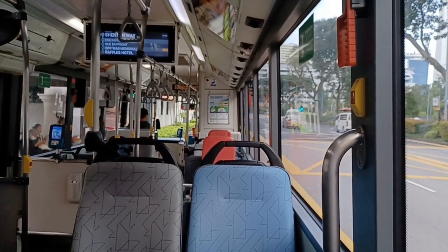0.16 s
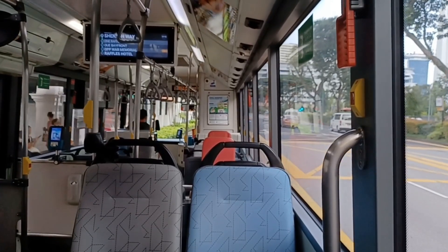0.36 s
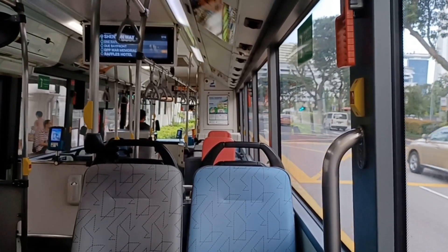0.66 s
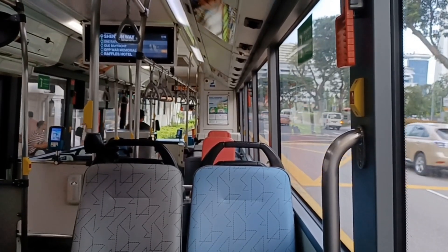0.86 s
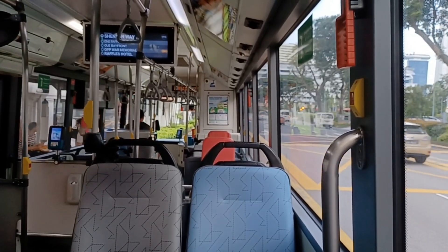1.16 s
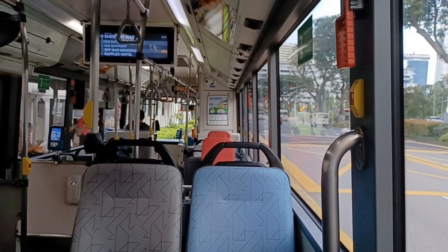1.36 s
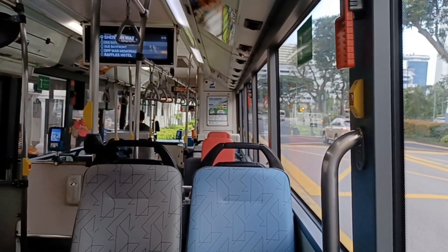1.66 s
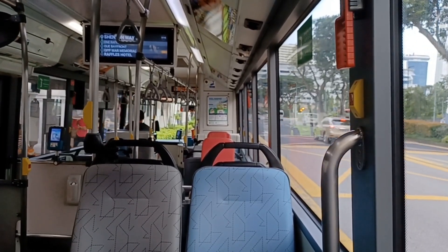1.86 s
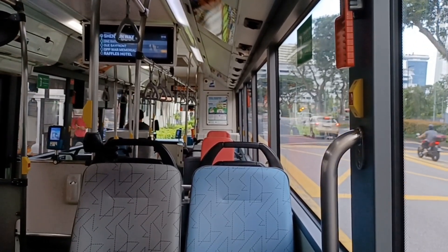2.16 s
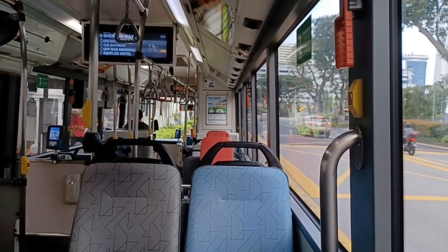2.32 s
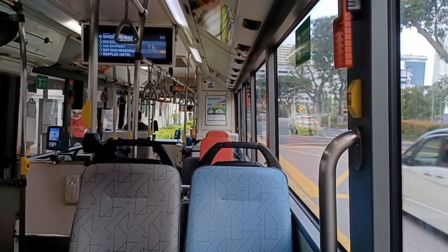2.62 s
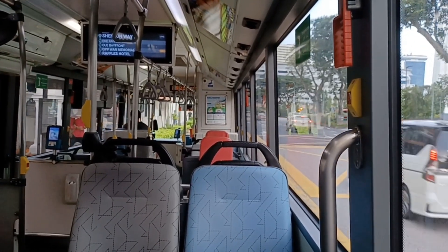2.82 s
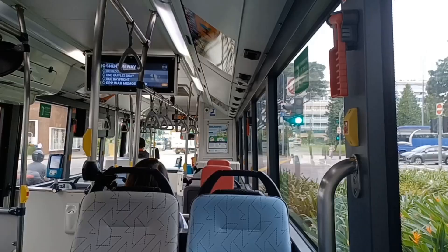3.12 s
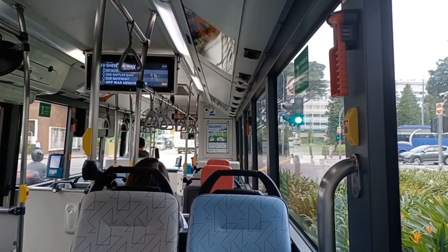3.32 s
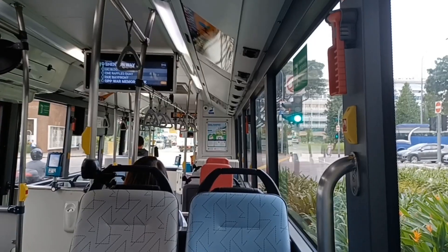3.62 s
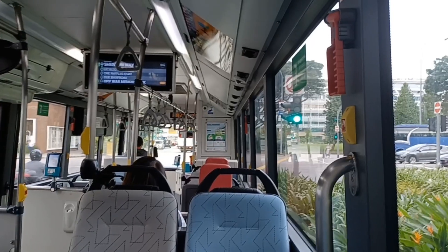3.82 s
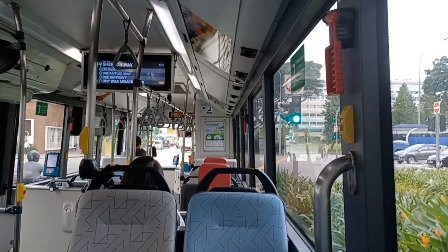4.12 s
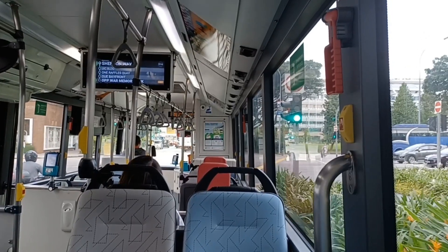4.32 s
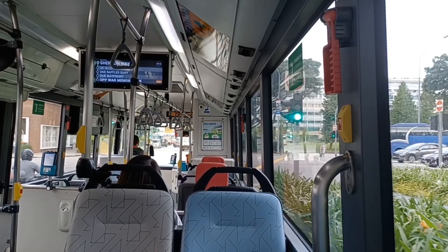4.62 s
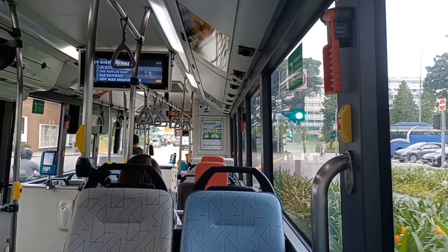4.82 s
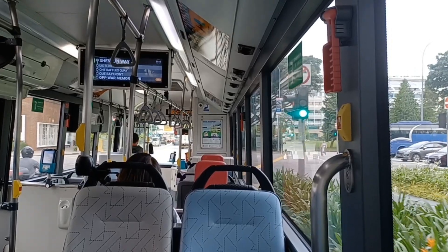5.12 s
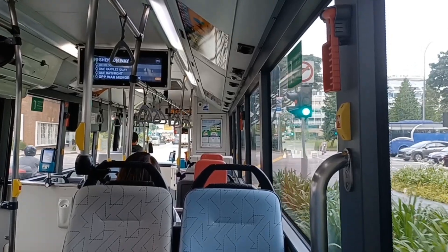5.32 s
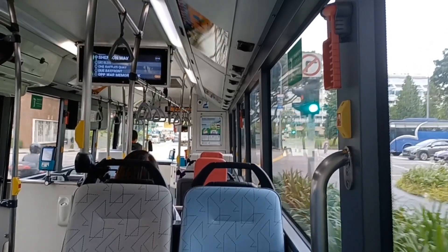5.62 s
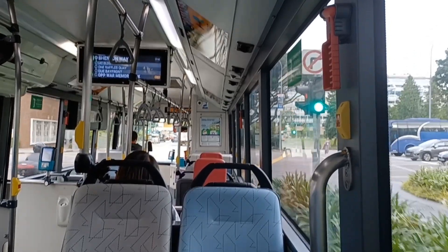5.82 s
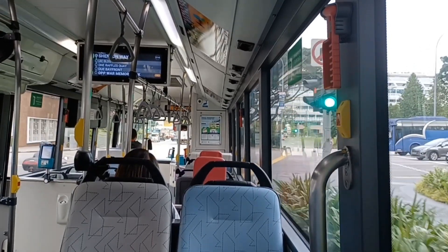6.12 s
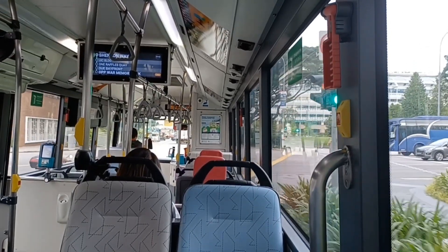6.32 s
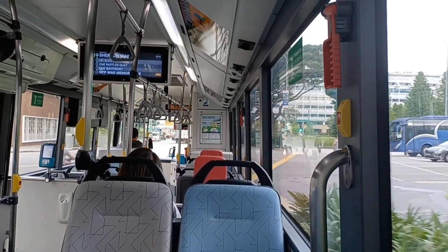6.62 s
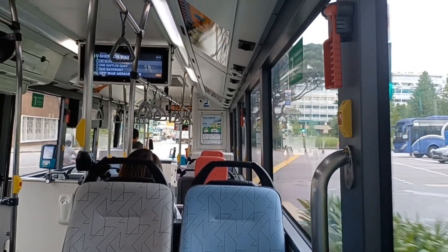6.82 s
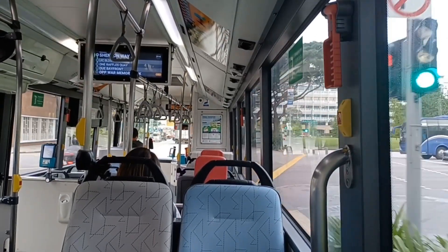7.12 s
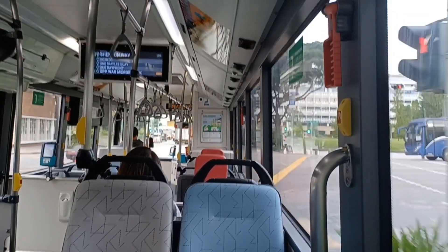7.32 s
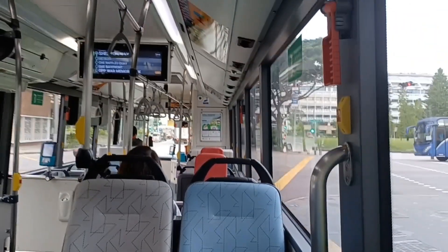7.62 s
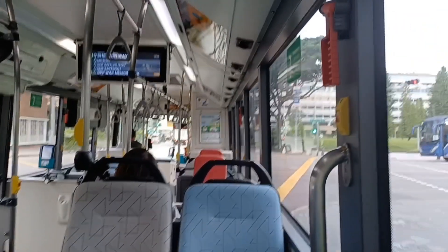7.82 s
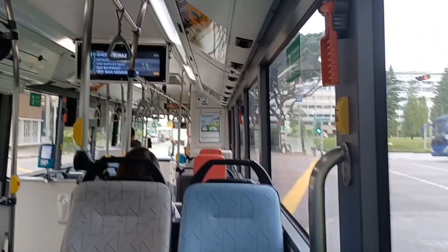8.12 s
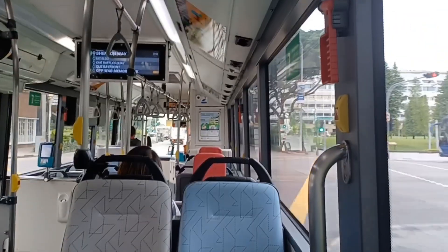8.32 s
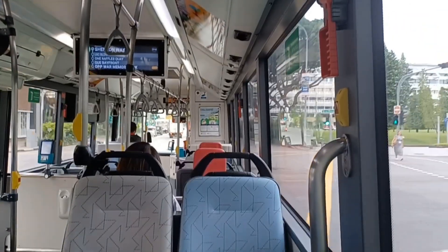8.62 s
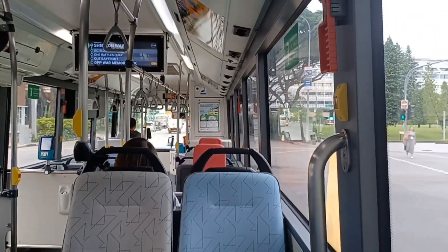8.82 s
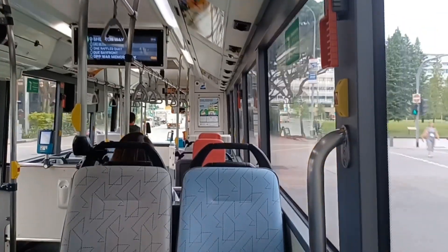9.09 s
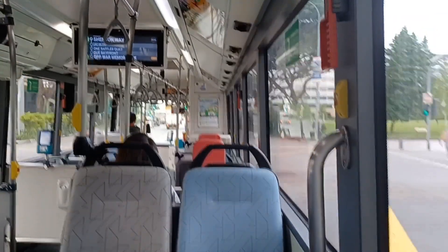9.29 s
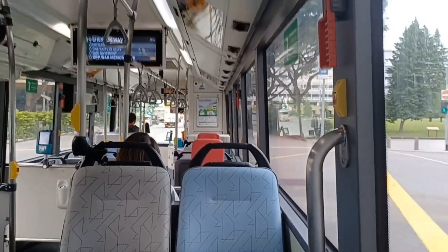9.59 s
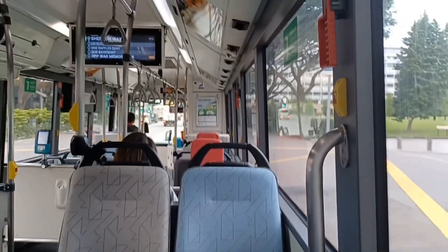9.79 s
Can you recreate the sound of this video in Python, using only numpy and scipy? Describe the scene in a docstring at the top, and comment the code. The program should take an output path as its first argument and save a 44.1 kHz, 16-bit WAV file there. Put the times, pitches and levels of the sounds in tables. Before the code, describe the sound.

A diesel bus idles with a few hisses of air, then pulls away, droning and whining, with loose fittings ticking in the cabin.

```python
"""City bus, rear seats.

A six-cylinder diesel idles while brake valves vent air three times. The sound is muted for a fifth of
a second and fades back in as the bus pulls away through two gear changes. Engine orders sweep through
the booming cabin, combustion shakes the panels, gears whine, loose trim ticks, squeaks and buzzes."""
import sys
import numpy as np
from scipy import signal
from scipy.fft import rfft, irfft, next_fast_len
from scipy.io import wavfile
from scipy.ndimage import uniform_filter1d

SR = 44100
rng = np.random.default_rng(int(sys.argv[2]) if len(sys.argv) > 2 else 0)


def generate_wav(signal):
    """Clip the signal to [-1, 1] and save it as 16-bit WAV at the path in sys.argv[1]."""
    frames = np.transpose(np.atleast_2d(signal))
    scaled = np.clip(frames, -1, 1) * 32767
    pcm = np.round(scaled).astype(np.int16)
    wavfile.write(sys.argv[1], SR, pcm)


N = 438794
T = np.arange(N) / SR
FFT_SIZE = 6 * next_fast_len(N // 6 + 1)
HZ = np.maximum(np.arange(FFT_SIZE // 2 + 1) * SR / FFT_SIZE, 1.)
MUTE_S, RESUME_S, FADE_S = 2.994, 3.211, .17


# four-stroke cycle rate: t/s, f/Hz
CYCLE_RATE = [(0, 6.58), (.75, 6.48), (1.5, 6.22), (2.5, 6.97), (3, 6.92), (3.9, 6.13), (4.7, 6.97),
              (5.5, 8.17), (6.1, 9.58), (6.3, 10.68), (6.7, 11.86), (6.9, 11.96), (7.1, 11.6), (7.3, 10.4),
              (7.7, 8.91), (7.9, 9.63), (8.6, 11.03), (8.8, 10.75), (9, 9.48), (9.15, 9.09), (9.4, 9.43),
              (9.95, 9.59)]

def flywheel():
    """Inertia rounds each speed change; returns cycle rate/Hz and phase/rad."""
    cycle_hz = uniform_filter1d(curves(CYCLE_RATE)[0], size=6000)
    return cycle_hz, 2 * np.pi * np.cumsum(cycle_hz) / SR


IDLE_HZ = 6.5
MAIN_ORDERS = (6, 9, 12, 15, 18, 21)  # cycle-rate multiples; three cylinders fire per bank
MAIN_DB, MAIN_DB_PER_OCTAVE = (-6.5, -4.5, -.5, 1.25, -1.5, -6), (-1, 1, -1, 2, -8.5, 4)
# engine load: t/s, then level/dB of main orders, minor orders, boom, drone, roar, clatter
LOAD = [(0, -32.5, -2, -20.5, -31, -31, -37), (.7, -38, -12, -21, -32, -33.5, -38),
        (1.5, -39.5, -16, -21, -30.5, -32, -36.5), (2.2, -40, 3, -18, -28, -30, -36.5),
        (2.98, -30.5, -15, -23.5, -31, -31, -37), (3.6, -33, -0.5, -17, -26, -30.5, -36.5),
        (4.3, -20.5, -0.5, -18.5, -27, -30, -35.5), (5.1, -27, -5, -17.5, -26.5, -29, -36.5),
        (5.6, -31.5, -10, -14, -24, -28.5, -35), (6, -22.5, -9.5, -13.5, -24.5, -29, -37),
        (6.35, -22, -4, -17.5, -25.5, -30, -35.5), (6.85, -23.5, -8.5, -17, -24.5, -28, -35),
        (7.4, -22.5, -3, -18, -25.5, -30.5, -37.5), (7.7, -25.5, -5, -16, -26.5, -31, -38),
        (8.1, -18.5, -5.5, -20, -25, -31, -37), (8.6, -16.5, -4.5, -19, -25.5, -32, -37),
        (9, -25, -8.5, -17, -26.5, -32.5, -38.5), (9.45, -21.5, -4, -18, -26, -33.5, -39),
        (9.95, -24, -5.5, -22.5, -27.5, -31.5, -36.5)]
# balance under load: t/s, then gain/dB per main order
BALANCE = [(0, 0, 0, 0, 0, 0, -12), (3.6, 0, 0, -6, 0, -5, 2), (4.2, -5, -7, 2, -6, -14, 4),
           (4.55, -12, -7, -4, -6, -3, 0), (4.8, -15, -4, -5, -8, 3, 1), (5.3, 6, 2, -1, -5, 11, -6),
           (5.75, 2, 4, -8, -10, 7, -5), (6, 7, -5, 3, -1, -2, -4), (6.4, 7, 2, -2, 0, 7, -28),
           (6.9, 0, 0, 4, 0, 3, -32), (7.2, 3, 3, -2, 0, 1, -22), (7.5, -3, 0, 1, 1, -3, -4),
           (7.8, 0, -4, 3, -2, -3, 2), (8.1, 0, 1, -6, -1, 3, -18), (8.4, 1, 2, -2, -9, -2, -32),
           (8.75, -4, 0, 2, -3, 2, -32), (8.95, 0, -2, 2, -3, -4, -8), (9.3, -1, -5, 2, -4, -9, 10),
           (9.95, -6, -2, -1, 1, -6, 9)]
# from unequal cylinders and pipes: order, level/dB
MINOR_ORDERS = [(7, 4), (8, -1), (10, -1), (11, -10), (13, -8), (14, -13), (16, -23), (17, -21), (19, -26),
                (20, -28), (23, -27), (24, -28)]
# firing overtones: order, level/dB re main orders
OVERTONES = [(30, -14), (36, -20)]
# mounts and floor, path of the main orders: f/Hz, gain/dB
MOUNTS = [(36, -29), (46, -4), (57, -12), (66, -12), (72, 7), (79, 6.5), (88, 5), (100, -0.7), (112, 10),
          (127, 8.5), (142, 7), (152, 8), (165, -1), (180, -0.5), (200, -9), (225, 16.5)]
# cabin, path of the minor orders: f/Hz, gain/dB
CABIN = [(36.0, -71.2), (50.0, -64.4), (62.0, -59.4), (72.0, -29.9), (79.0, -22.9), (88.0, -24.3),
         (100.0, -25.5), (112.0, -7.0), (122.0, -11.0), (132.0, -4.0), (142.0, -3.5), (152.0, 0.0),
         (165.0, -12.0), (180.0, -2.0), (200.0, -3.8), (225.0, -0.5), (290.0, -18.4)]

def engine_orders(cycle_hz, phase):
    """Harmonics of the firing cycle sweep through the mount and cabin resonances."""
    main_db, minor_db = curves(LOAD)[:2]
    octaves = np.log2(cycle_hz / IDLE_HZ)
    levels = [(order, db + minor_db + colour(CABIN, order * cycle_hz)) for order, db in MINOR_ORDERS]
    for order, db, slope, shift_db in zip(MAIN_ORDERS, MAIN_DB, MAIN_DB_PER_OCTAVE, curves(BALANCE)):
        source_db = main_db + db + shift_db + slope * octaves
        levels.append((order, source_db + colour(MOUNTS, order * cycle_hz)))
    levels += [(order, db + main_db) for order, db in OVERTONES]
    tones, step = 0, 16  # low tones, run at SR / step
    for order, db in levels:
        drift_rad = .2 * wander(4, step) + 2 * np.pi * rng.random()
        tones += undb(db[::step] + wander(7, step)) * np.sin(order * phase[::step] + drift_rad)
    return signal.resample_poly(tones, step, 1)[:N]


# noise through floor and bulkhead: f/Hz, density/dB
ROAR_SPECTRUM = [(15, -88.5), (25, -43), (43, -38.5), (51, -40), (65, -21), (137, -9), (179, -17.5),
                 (435, -22), (571, -23), (934, -26), (1110, -29), (1450, -31.5), (2690, -41), (4980, -45),
                 (9000, -73), (11700, -104), (19800, -120)]
# panel resonances: f/Hz, width/Hz, gain/dB
PANEL_MODES = [(76, 12, 3), (145, 25, 4), (197, 8, 6), (285, 12, 4), (344, 25, 3), (435, 14, 5),
               (510, 50, 1), (940, 25, 6), (1450, 25, 5), (1685, 30, 5), (2450, 200, 2), (3500, 500, 2),
               (4910, 120, 2.5)]

def panel_roar(phase):
    """Combustion noise booms in the cabin; above the boom, the panels throb with the firings."""
    boom_db, drone_db, roar_db, clatter_db = curves(LOAD)[2:]
    noise = diffuse(colour(ROAR_SPECTRUM) + resonances(PANEL_MODES))
    throb = 1 + .038 * np.cos(MAIN_ORDERS[0] * phase)
    out = unit_rms(band(noise, 15, 270)) * undb(boom_db)
    for lo_hz, half_octaves, level_db in ((270, 2, drone_db), (540, 3, roar_db), (1527, 5, clatter_db)):
        swell_db = .54 * wander(2.96)
        edges_hz = lo_hz * 2 ** (np.arange(half_octaves + 1) / 2)
        layer = sum(band(noise, lo, hi) * undb(swell_db + .49 * wander(7))
                    for lo, hi in zip(edges_hz, edges_hz[1:]))
        out += unit_rms(layer) * undb(level_db) * throb
    return out


# air blows, one list per outlet:
# t/s, attack/s, hold/s, sag/(dB/s), release/(dB/s), hiss/dB, whistle/dB, rush/dB
BLOWS = [
    [(.115, .01, .02, 13, 221.5, -46, -47, -35), (.258, 0.0025, 0.15, 26, 200, -37.5, -46, -29)],
    [(1.648, 0.023, 0.048, 13, 117, -43, -39, -37), (1.9, 0.063, 0.12, 11, 82, -53, -47, -36)],
    [(2.35, 0.012, 0.07, 11, 110, -25.5, -30, -33.5)],
    [(2.41, 0.012, 0.055, 29, 73, -31, -31, -29)],
    [(2.43, .015, .06, 10, 150, -70, -70, -33.5)],
    [(2.53, 0.1, 0.45, 4, 98, -41.5, -45.5, -37)],
]
# resonances, one list per outlet: f/Hz, width/Hz, gain/dB
OUTLET_MODES = [
    [(870, 210, 20), (1360, 280, 17), (2000, 180, 12.5), (2415, 220, 9.5), (3300, 300, 11.5),
     (3980, 290, 4), (8200, 700, -11), (12500, 3000, 6.5)],
    [(5600, 800, 15), (7260, 300, 11), (6830, 200, 7), (10700, 2000, 6)],
    [(4100, 500, 5.5), (5800, 550, 10), (7160, 400, 4), (8300, 600, -8), (10000, 800, 2),
     (12700, 3000, 6.5)],
    [(3700, 1400, 6.5), (5120, 1100, 4), (8170, 610, -4), (9500, 1200, 7.5), (12500, 3000, 1)],
    [(1350, 400, 12), (2100, 600, 10)],
    [(2200, 790, 8), (9200, 500, -2), (12800, 1600, 13)],
]
# brief rough ringing pulses in the first air blast: t/s, length/s, f/Hz, level/dB
VENT_RESONANCE_PULSES = [(.265, .015, 3300, -40), (.282, .02, 1370, -33), (.288, .03, 2450, -38),
                         (.298, .03, 3280, -38), (.31, .02, 2000, -38), (.312, .02, 900, -31),
                         (.336, .012, 1400, -36), (.345, .035, 3300, -39), (.352, .045, 2420, -38),
                         (.355, .04, 4000, -43), (.385, .02, 750, -32), (.395, .04, 1400, -37),
                         (.42, .03, 3250, -43)]

def brake_valves():
    """Turbulent jets ring their outlets, sag and die away; the first vent's resonances pulse."""
    out, n = np.zeros((2, N)), N // 3
    for blows, modes in zip(BLOWS, OUTLET_MODES):
        jet = diffuse(resonances(modes), step=3)
        hiss, whistle, rush = (unit_rms(band(jet, lo_hz, hi_hz, step=3))
                               for lo_hz, hi_hz in ((8300, 17000), (4700, 8300), (750, 4700)))
        rush *= undb(1.6 * wander(70)[:n])  # level flutters
        for start_s, attack_s, hold_s, sag, release, hiss_db, whistle_db, rush_db in blows:
            age_s = np.maximum(T[:n] - start_s, 0)
            fall_db = sag * np.minimum(age_s, hold_s) + release * np.maximum(age_s - hold_s, 0)
            envelope = (1 - np.exp(-age_s / attack_s)) * undb(-fall_db)
            air = hiss * undb(hiss_db) + whistle * undb(whistle_db) + rush * undb(rush_db)
            out[:, :n] += envelope * air
    out += rough_tones(VENT_RESONANCE_PULSES, waver=.06)
    return out * undb(.6 * wander(25)) * pan(-2)


# gear tone: t/s, f/Hz, level/dB
WHINE = [(5.1, 410, -60), (5.25, 425, -31), (5.8, 535, -34), (5.95, 565, -44), (6.1, 595, -33),
         (6.45, 704, -37), (6.7, 782, -36), (6.9, 792, -37), (7.1, 762, -39), (7.5, 595, -42),
         (7.75, 560, -55), (8.1, 630, -38), (8.6, 686, -39), (8.8, 660, -41), (8.95, 600, -41),
         (9.1, 570, -60)]

def gear_whine():
    """Meshing gears: one gliding tone, wavering in pitch and level."""
    hz, db = curves(WHINE)
    hz = uniform_filter1d(hz, size=4000) * (1 + .004 * wander(30))
    return undb(db + 2.2 * wander(14)) * np.sin(2 * np.pi * np.cumsum(hz) / SR)


# trim knocks: t/s, level/dB, left minus right/dB
TICKS = [(3.8885, -40, -3), (5.5971, -30, 16), (5.608, -40, 14), (5.9733, -42, -1), (7.4324, -35, 1.1),
         (8.2371, -34, 13), (8.3858, -46, 0.1), (8.5125, -36, 5), (8.6495, -46, 3), (8.6781, -53, 1),
         (8.723, -43, 1.1), (8.7764, -44, 11), (8.883, -31.5, 13), (8.9245, -36, 10), (9.1745, -42, 9.5),
         (9.4229, -44, 6), (9.4663, -40, 11), (9.6913, -40, 6.5), (9.7015, -43, 6.5), (9.7322, -39, 0.1),
         (9.7385, -40, 3), (9.789, -45, 3), (9.8175, -45, -1.1), (9.898, -34, 8), (9.907, -39, 8)]
# tick spectrum: f/Hz, level/dB
TICK_SPECTRUM = [(2500, -22), (4500, -4.5), (6500, -8), (8500, -12.5), (11000, -4.5), (14000, -6),
                 (16000, -11.5)]
TICK_T60_S, SHIVER_T60_S, SHIVER_DB, TINY_TICKS_PER_S = .005, .25, -27.5, 9

def trim_ticks():
    """Loose trim knocks and shivers on in bursts of bright noise; the moving bus adds tiny ticks."""
    buzz_db, = curves(BUZZ_LEVEL)
    tiny = rng.random(N) < TINY_TICKS_PER_S / SR * (T > RESUME_S)
    strikes = tiny * undb(buzz_db + 3 + 1.5 * rng.exponential(size=N)) * pan(5)
    for start_s, db, pan_db in TICKS:
        strikes[:, int((start_s + .001) * SR)] += undb(db) * pan(pan_db)[:, 0]
    age_s = T[None, :9000]
    decay = undb(-60 * age_s / TICK_T60_S) + undb(SHIVER_DB - 60 * age_s / SHIVER_T60_S)
    envelope = signal.fftconvolve(strikes, decay, axes=1)[:, :N]
    noise = rfft(rng.standard_normal((1, FFT_SIZE))) * undb(colour(TICK_SPECTRUM))
    return envelope * unit_rms(band(noise, 2000, 17000))


# rubbing fittings: t/s, length/s, f/Hz, level/dB
SQUEAKS = [(4.75, .06, 4880, -50), (4.91, .04, 4880, -54), (5.03, .055, 4860, -47), (5.18, .03, 4900, -50),
           (5.25, 1.3, 4920, -57), (5.41, .04, 4900, -50), (5.9, .05, 4900, -50), (9.68, .04, 3480, -54),
           (9.735, .015, 3350, -49), (9.78, .02, 3450, -50), (9.887, .012, 4300, -44),
           (9.92, .014, 4300, -44)]

def squeaks():
    """Fittings stick and slip."""
    return rough_tones(SQUEAKS, waver=.014)


# thin tones: t/s, length/s, f/Hz, level/dB
HUMS = [(8.704, 2.3, 1450, -46.5), (9.752, 0.67, 750, -41)]

def hums():
    """Steady pitches swell and fade."""
    return sum(undb(db) * bell(T, peak_s, length_s) * np.sin(2 * np.pi * hz * T)
               for peak_s, length_s, hz, db in HUMS)


# trim buzz: t/s, level/dB
BUZZ_LEVEL = [(0, -55.5), (1.5, -56), (2.9, -56), (3.6, -58), (4, -54), (4.76, -58), (5.73, -54.5),
              (6.1, -57.5), (6.8, -54.5), (7.15, -57.5), (7.43, -52.5), (7.6, -55.5), (7.72, -54),
              (7.9, -59), (8.2, -55), (9.5, -59), (9.88, -55)]
# buzz spectrum: f/Hz, density/dB
BUZZ_SPECTRUM = [(4120, -31), (7000, -4.5), (8360, -9), (11200, -5), (12600, -7.5), (15600, -13)]

def trim_buzz():
    """Tiny rattles merge into a flickering treble haze, duller at a standstill."""
    buzz_db, = curves(BUZZ_LEVEL)
    haze = band(diffuse(colour(BUZZ_SPECTRUM)), 5700, 17000)
    top = haze - uniform_filter1d(haze, size=2)
    haze -= .64 * (T < MUTE_S) * top
    flicker_db = np.where(T > RESUME_S, 1.1, .7) * wander(110)
    return unit_rms(haze) * undb(buzz_db + flicker_db)


# left-right likeness, inverted near 1 kHz by cross-cabin standing waves: f/Hz, correlation
CORRELATION = [(150, .995), (200, .95), (300, .85), (430, .45), (700, .38), (850, .2), (950, 0),
               (1080, -.45), (1250, -.26), (1450, 0), (1680, -.3), (1950, 0)]

def diffuse(shape_db, step=1):
    """Stereo spectra of noise from all sides: alike in the bass, unrelated in the treble."""
    alike = colour(CORRELATION, HZ[::step])
    mid, side = rfft(rng.standard_normal((2, 2 * len(alike) - 2)))
    mid, side = mid * np.sqrt(1 + alike), side * np.sqrt(1 - alike)
    return np.array([mid + side, mid - side]) * undb(shape_db[::step])


def rough_tones(events, waver):
    """Tone pulses that shake in level and in pitch (waver: fraction of f)."""
    out = np.zeros(N)
    pitch_ratio, flutter = 1 + waver * wander(500), undb(3 * wander(250))
    for peak_s, length_s, hz, db in events:
        start, end = int((peak_s - 2 * length_s) * SR), int((peak_s + 2 * length_s) * SR)
        stretch = slice(start - hz, end - hz)  # each pitch shakes its own way
        tone = flutter[stretch] * np.sin(2 * np.pi * hz * np.cumsum(pitch_ratio[stretch]) / SR)
        out[start:end] += undb(db) * bell(T[start:end], peak_s, length_s) * tone
    return out


def band(spectra, lo_hz, hi_hz, step=1):
    """One band as N // step samples; edges 0.15 octave wide."""
    def edge(hz):
        return np.clip(.5 + np.log2(HZ[::step] / hz) / .15, 0, 1) * np.pi / 2
    return irfft(spectra * np.sin(edge(lo_hz)) * np.cos(edge(hi_hz)))[:, :N // step]


def wander(rate_hz, step=1):
    """Smooth random curve, spread near 1."""
    span = int(SR / rate_hz)
    knots = rng.standard_normal(N // span + 2)
    joined = np.interp(T[::step] * rate_hz, np.arange(len(knots)), knots)
    return 1.533 * uniform_filter1d(joined, span // 2 // step)


def curves(table):
    """Columns of a time table, per sample."""
    times_s, *columns = np.transpose(table)
    return [np.interp(T, times_s, column) for column in columns]


def colour(table, hz=HZ):
    """Frequency table, interpolated over log f."""
    knots_hz, values = np.transpose(table)
    return np.interp(np.log(hz), np.log(knots_hz), values)


def resonances(modes):
    """Summed gain/dB over frequency."""
    return sum(db / (1 + (2 * (HZ - hz) / width_hz) ** 2) for hz, width_hz, db in modes)


def bell(t, peak_s, length_s):
    return np.exp(-(2 * (t - peak_s) / length_s) ** 2)


def pan(left_minus_right_db):
    return undb(np.array([[.5], [-.5]]) * left_minus_right_db)


def undb(db):
    return 10 ** (db / 20)


def unit_rms(x):
    return x / np.sqrt(np.mean(x ** 2))


def scene():
    cycle_hz, phase = flywheel()
    drivetrain = engine_orders(cycle_hz, phase) + gear_whine() + hums() + panel_roar(phase)
    return drivetrain + brake_valves() + trim_buzz() + trim_ticks() + squeaks()


# stereo tilt: f/Hz, left minus right/dB
TILT = [(60, -1), (110, -2), (200, -4), (380, -1.5), (700, -1), (1290, 0.0), (2380, 0.0), (4400, 0),
        (8120, -0.5), (15000, -2.5)]
LOWPASS_HZ = 15650

def record(dry):
    """Bass leans right; the sound mutes, fades back in, clips near full scale and loses its top."""
    tilted = irfft(rfft(dry, FFT_SIZE) * pan(colour(TILT)), FFT_SIZE)[:, :N]
    fade_in = np.clip((T - RESUME_S) / FADE_S, 0, 1) ** .61
    gain = uniform_filter1d(np.where(T < MUTE_S, 1, fade_in), size=40)
    clipped = np.clip(tilted * gain, -1.02, 1.02)
    return signal.sosfiltfilt(signal.ellip(8, .2, 45, LOWPASS_HZ, fs=SR, output="sos"), clipped)


dry = scene()
out = record(dry)
generate_wav(out)
```